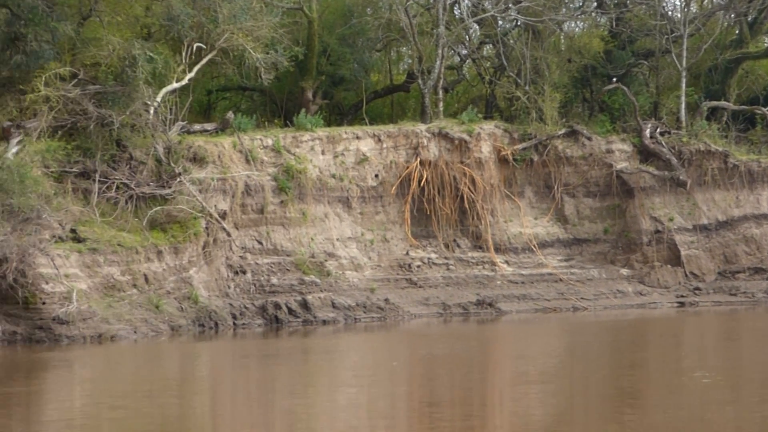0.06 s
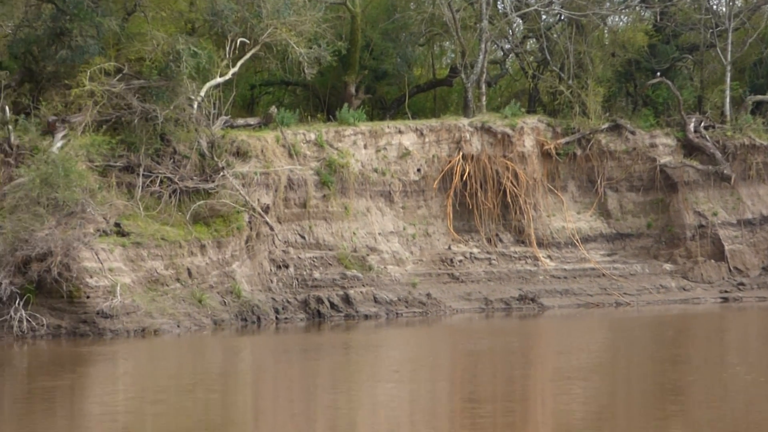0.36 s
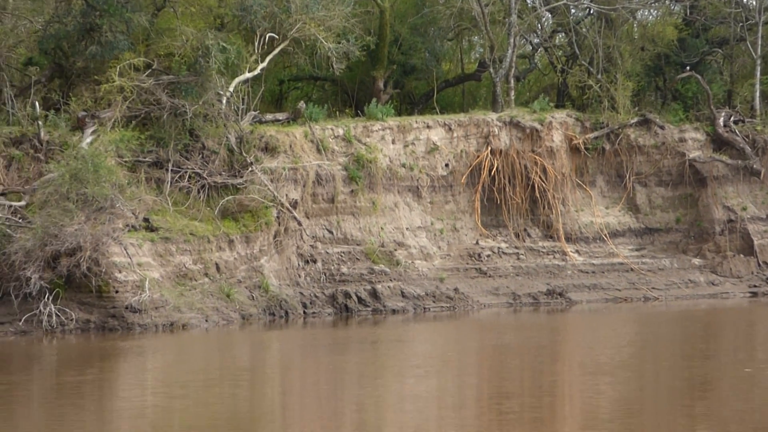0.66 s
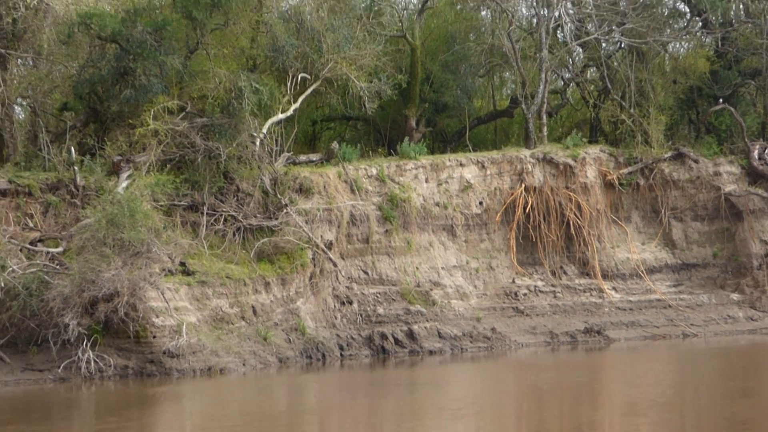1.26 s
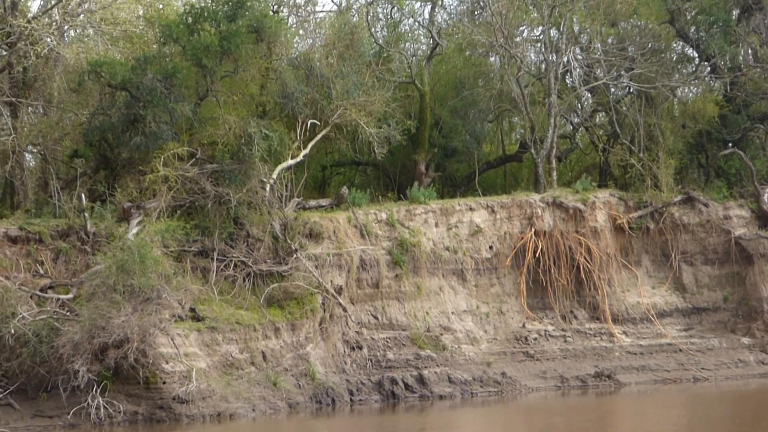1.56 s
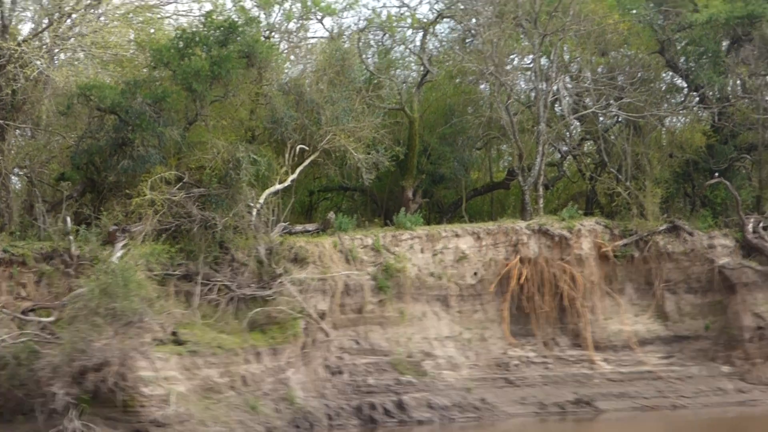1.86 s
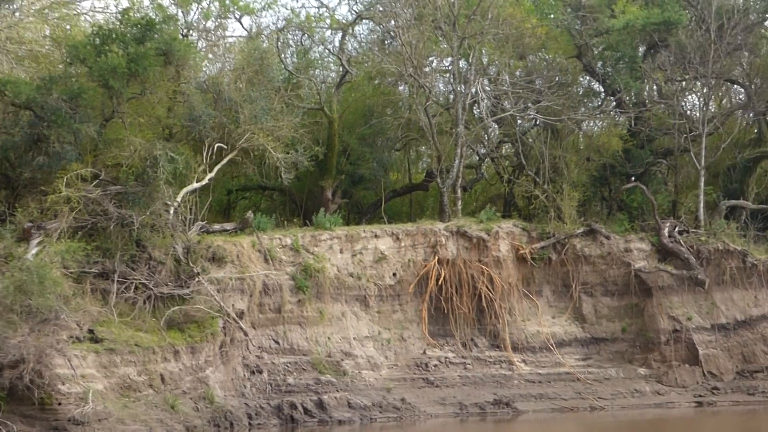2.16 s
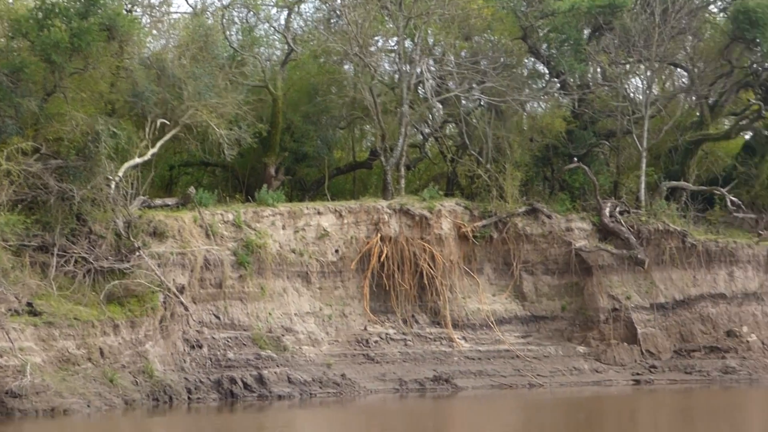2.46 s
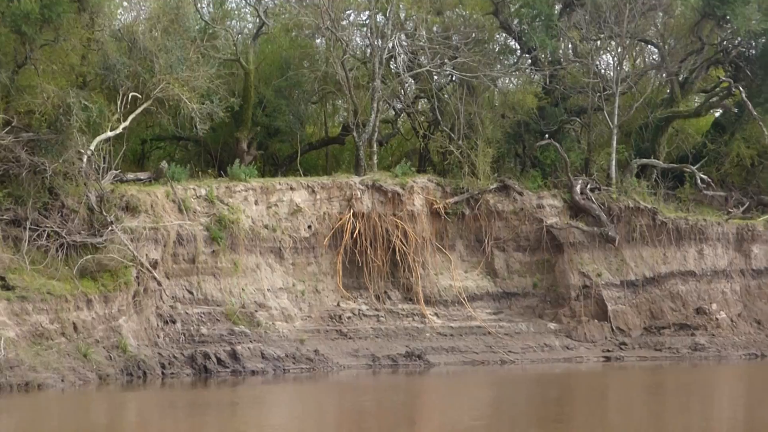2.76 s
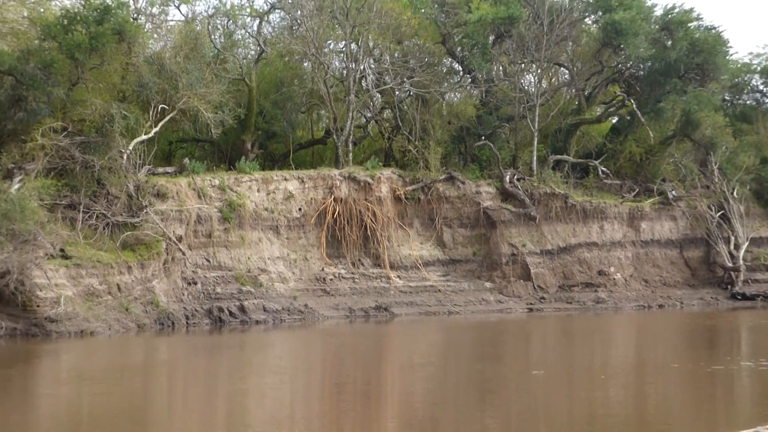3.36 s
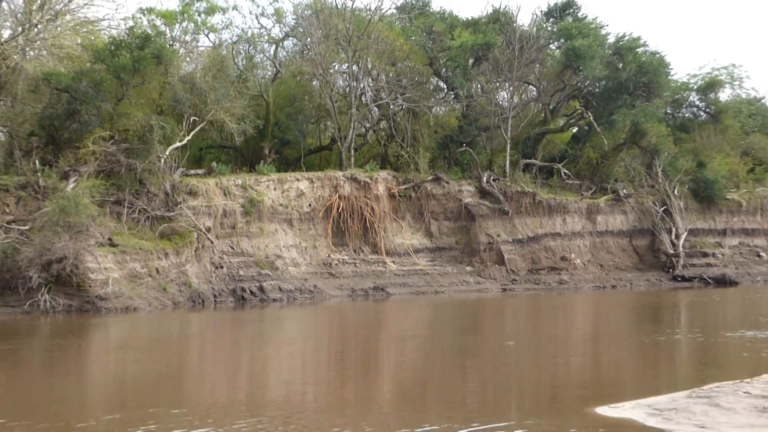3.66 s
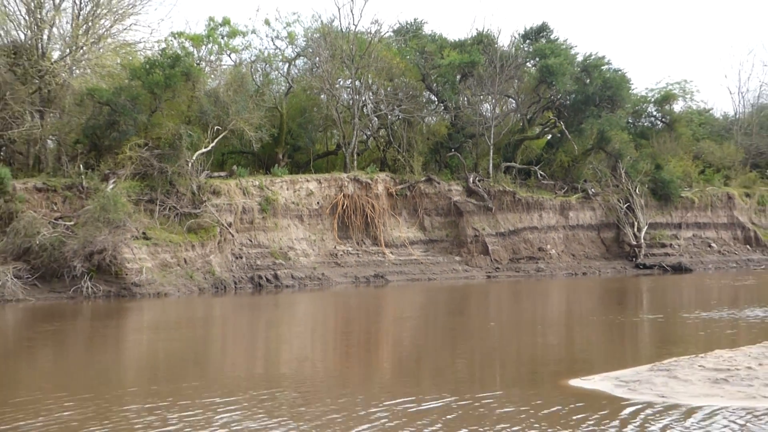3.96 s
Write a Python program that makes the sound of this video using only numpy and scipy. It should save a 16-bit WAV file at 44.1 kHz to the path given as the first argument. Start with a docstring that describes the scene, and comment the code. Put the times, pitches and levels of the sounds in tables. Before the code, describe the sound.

Birds call over a soft hush of river and leaves. One gives harsh, quick chucks for the first second, then another trills in high falling notes, with whistles around it. Chirps are busiest from 1.5 to 2.4 seconds, followed by more trills, one distant, fading after 3 seconds. From about 1.5 seconds to the end, louder wind gusts rumble, sputter and thump on the microphone.

```python
"""Birds and wind on a river bank

Over the soft hush of river and leaves, one bird chucks harshly, one trills in falling notes,
a far one trills in rising notes, and others whistle. Each note is a short sliding tone, and
the trees scatter it into echoes. From about 1.5 s gusts of wind hit the microphone, where
their swirls of air rumble, sputter and thump."""
import sys
import numpy as np
from scipy import signal
from scipy.fft import rfft, irfft
from scipy.io import wavfile
from scipy.ndimage import uniform_filter1d

SR = 44100
rng = np.random.default_rng(int(sys.argv[2]) if len(sys.argv) > 2 else 0)


def log_audio(samples):
    """Write samples as a 16-bit WAV file to the path given in sys.argv[1]."""
    # one column per channel
    frames = np.atleast_2d(samples).T
    # limit to full scale, then quantise
    limited = np.clip(frames, -1, 1)
    pcm = np.round(limited * 32767).astype(np.int16)
    wavfile.write(sys.argv[1], SR, pcm)


N = 176400
T = np.arange(N) / SR

# Tone of the hush, shared by left and right (mid) and opposite in them (side): pitch_hz, level_db
HUSH_MID_TONE = [(20, -25.5), (50, -16.5), (110, -2), (180, -4), (235, 1.5), (330, -10), (480, -8),
                 (700, -14.5), (1250, -14.5), (1600, -21.5), (2500, -21.5), (3400, -26.5), (3950, -20),
                 (5000, -20), (6500, -28), (9000, -31), (15500, -40)]
HUSH_SIDE_TONE = [(25, -28), (70, -6), (200, -13.5), (450, -3), (1200, 4), (2000, -11.5), (4500, -16),
                  (8000, -22.5), (15000, -28.5)]
# Tone of the high rustle: pitch_hz, level_db
RUSTLE_TONE = [(3000, -20.5), (5000, 15.5), (7000, -3), (9000, 7.5), (12000, -14), (15500, -11)]
# The rustle coming up late: time_s, level_db
RUSTLE_SWELL = [(0, -102), (2.8, -95.5), (2.92, -67), (3.3, -67), (4, -72)]
# Harsh chucks: start_s, level_db, change_per_overtone_db
CHUCK_NOTES = [(-.008, -52, -9), (.091, -49.5, -5.5), (.193, -48, -11), (0.291, -47.5, -17),
               (0.393, -43.5, -5.5), (.497, -42.5, -5), (.601, -41.5, -4), (0.706, -44, -2.5),
               (0.811, -41, -2)]
# Tone of the rasp in a chuck: pitch_hz, level_db
RASP_TONE = [(900, -10.5), (1500, -2), (2100, -9), (2500, -7), (3050, 5.5), (3600, -11), (8000, -15.5),
             (11000, -35)]
# Dry ticks beside some chucks: time_s, level_db
DRY_TICKS = [(0.022, -59), (0.286, -68), (0.492, -47.5), (.702, -45)]
# Long clear whistles: start_s, length_s, first_hz, middle_hz, last_hz, level_db
LONG_WHISTLES = [(.095, 0.182, 4170, 3950, 3950, -54.5), (.385, 0.13, 4510, 4745, 4805, -52),
                 (.532, 0.082, 4730, 4460, 3650, -52), (.612, 0.091, 3780, 3430, 3130, -58),
                 (.812, .063, 3700, 3784, 3840, -48), (1.795, 0.15, 5080, 4360, 4185, -47.5),
                 (2.66, .16, 4420, 4470, 4470, -55), (2.95, 0.23, 6500, 4785, 3855, -52.5),
                 (3.02, .21, 6320, 4300, 3180, -59)]
# Quick sliding whistles: start_s, length_s, first_hz, middle_hz, last_hz, level_db
QUICK_WHISTLES = [(.885, 0.029, 1510, 1540, 1500, -62), (.93, .16, 8900, 8320, 7860, -72),
                  (1.238, 0.021, 9000, 7770, 6860, -58), (1.293, 0.016, 2520, 2570, 2300, -57),
                  (1.318, 0.039, 4160, 3350, 2840, -56), (1.38, 0.058, 2740, 2360, 1920, -59.5),
                  (1.537, 0.028, 4270, 3420, 2420, -55.5), (1.517, 0.11, 2413, 2635, 2070, -57.5),
                  (1.59, 0.081, 2890, 3290, 3800, -52), (1.672, 0.087, 3900, 4750, 5750, -44),
                  (1.684, 0.022, 4850, 5540, 5970, -55), (1.695, 0.097, 2650, 2314, 2036, -59),
                  (1.754, 0.028, 5800, 6600, 9050, -51.5), (1.781, 0.019, 8560, 7900, 5000, -56),
                  (1.801, 0.054, 4500, 2890, 2130, -50), (1.88, 0.075, 1985, 2075, 2120, -58),
                  (1.893, 0.053, 2610, 3070, 3140, -58), (1.978, 0.067, 2035, 2300, 1890, -59),
                  (1.975, 0.05, 7100, 7300, 5900, -48.5), (2.039, 0.033, 6990, 5200, 3960, -47),
                  (2.063, 0.052, 4250, 3120, 1850, -51), (2.124, .028, 4990, 5460, 7850, -46.5),
                  (2.135, 0.053, 2330, 2965, 3750, -52.5), (2.154, 0.017, 7710, 5720, 5100, -43.5),
                  (2.172, 0.12, 4890, 5230, 5080, -55), (2.211, 0.06, 9100, 7150, 8200, -52.5),
                  (2.255, 0.047, 4300, 4200, 3480, -47.5), (2.288, 0.023, 2810, 2660, 2720, -51.5),
                  (2.283, 0.089, 3840, 3730, 3420, -53.5), (2.302, 0.036, 5030, 4700, 4200, -46.5),
                  (2.333, 0.027, 2730, 2250, 1960, -53.5), (2.365, 0.051, 4050, 3966, 3960, -47),
                  (2.73, 0.18, 3960, 3960, 4020, -61), (3.158, 0.012, 5530, 6600, 6800, -47.5),
                  (3.164, 0.012, 7140, 7600, 8100, -48)]
# A thin squeak and its falling tail: start_s, length_s, first_hz, middle_hz, last_hz, level_db
HIGH_SQUEAK = [(1.578, .06, 13040, 12980, 13300, -61), (1.622, 0.018, 12800, 12400, 11200, -63)]
# Falling trill notes: start_s, top_hz, fall_s, level_db
FALLING_NOTES = [(0.898, 6050, 0.013, -50), (0.968, 6120, 0.016, -47), (1.043, 5970, 0.017, -49),
                 (1.115, 6100, 0.018, -49.5), (1.19, 6270, 0.019, -52), (1.269, 5950, 0.018, -53.5),
                 (1.344, 5700, 0.016, -53), (2.343, 7210, 0.017, -44.5), (2.558, 7420, 0.022, -48.5),
                 (2.646, 6620, 0.016, -49), (2.735, 6500, 0.016, -50.5), (2.82, 6450, 0.015, -49),
                 (2.903, 6280, 0.018, -50), (2.987, 6800, 0.016, -51.5), (3.073, 6710, 0.019, -53),
                 (3.16, 6110, 0.014, -53), (3.311, 5900, 0.017, -61.5), (3.353, 5670, 0.016, -61),
                 (3.393, 6300, 0.022, -60.5), (3.422, 5500, 0.014, -65), (3.459, 7350, 0.024, -65),
                 (3.479, 5800, 0.012, -58.5), (3.549, 5960, 0.016, -61), (3.612, 5710, 0.015, -59),
                 (3.633, 6300, 0.015, -64), (3.68, 5700, 0.02, -67), (3.738, 6460, 0.02, -71),
                 (3.877, 5830, 0.023, -68)]
# Strength of the wind on the microphone: time_s, rumble_db, sputter_db
GUST_LEVELS = [(0, -100, -75), (1.2, -76, -100), (1.39, -48, -103), (1.45, -58.5, -79),
               (1.56, -36.5, -69.5), (1.78, -34.5, -51), (1.9, -36, -56.5), (2.14, -27.5, -42),
               (2.27, -30, -54), (2.33, -30, -45.5), (2.478, -31.5, -35), (2.506, -41.5, -63),
               (2.53, -31, -48.5), (2.6, -30, -47.5), (2.71, -26.5, -42), (2.84, -30.5, -71.5),
               (3.03, -28, -56), (3.08, -34.5, -81), (3.24, -33, -72), (3.275, -45.5, -109),
               (3.33, -31, -107), (3.39, -40.5, -90), (3.45, -28, -61.5), (3.58, -38.5, -47.5),
               (3.68, -28.5, -42.5), (3.8, -31.5, -37.5), (3.88, -32.5, -41), (4, -30.5, -42)]
# Which side the gusts favour: time_s, left_minus_right_db
GUST_PAN = [(1.5, -3.5), (1.99, -4), (2.07, 2), (2.16, 2.5), (2.22, -3.5), (2.48, -1.5), (2.53, 5.5),
            (2.66, 4), (2.72, 0), (2.92, 5), (3.03, -1.5), (3.35, 7.5), (3.52, -5.5), (3.59, 6.5),
            (3.65, -5), (4, -2)]
# Tone of the wind's low rumble and higher sputter, mid and side: pitch_hz, level_db
RUMBLE_MID_TONE = [(20, -55), (40, -45), (70, -14), (120, -6.5), (170, 1), (230, 1.5), (360, -4),
                   (415, -12.5), (460, -8.5), (600, -19.5), (850, -29.5), (1400, -42), (3000, -80)]
RUMBLE_SIDE_TONE = [(20, -56), (60, -31), (120, 2), (240, 7), (360, 2.5), (415, -3.5), (470, 3.5),
                    (650, -8), (900, -14), (1400, -26), (3000, -85)]
SPUTTER_MID_TONE = [(200, -26), (500, 9.5), (800, -1.5), (1200, -10), (1700, -17), (2500, -28), (4000, -32),
                    (9000, -71)]
SPUTTER_SIDE_TONE = [(200, -27.5), (500, 16), (800, 2), (1200, -5), (1700, -16), (2500, -25.5),
                     (4000, -41.5), (9000, -66)]
# Single hard thumps of wind: peak_s, level_db, length_s, pitch_hz, sputter_db, left_minus_right_db
WIND_THUMPS = [(1.512, -31, 0.0089, 166, -70, -10), (1.779, -20.5, 0.0043, 253, -39, 0),
               (1.98, -24, 0.0067, 280, -31, -15), (2.051, -20, 0.0064, 254, -34, 10),
               (2.136, -23, 0.014, 300, -32.5, 5), (2.22, -13.5, 0.011, 213, -38.5, -4.5),
               (2.299, -20.5, 0.006, 340, -33, -6), (2.325, -34, 0.0037, 415, -23, -1.5),
               (2.404, -14.5, 0.0081, 276, -44, 4), (2.435, -12.5, 0.0067, 316, -29.5, -14),
               (2.466, -16.5, 0.0092, 265, -27, 3.5), (2.522, -17, 0.009, 222, -41, 3),
               (2.705, -24, 0.0078, 250, -34.5, -13), (2.867, -13.5, 0.0073, 229, -66, 2.5),
               (2.944, -21.5, 0.0054, 310, -37, -6), (3.02, -15.5, 0.0083, 226, -55, -5),
               (3.243, -20, 0.0081, 190, -55, 2.5), (3.337, -20.5, 0.012, 176, -75, 5),
               (3.586, -20.5, 0.0052, 245, -45, 15)]
# The far bird's rising notes: start_s, level_db
RISING_NOTES = [(2.41, -54), (2.475, -57), (2.536, -52.5), (2.592, -50), (2.649, -52.5), (2.71, -55.5),
                (2.769, -55), (2.826, -55.5), (2.89, -55.5), (2.948, -56)]

TREE_ECHO_S = 0.55  # time for the scattered sound to fade by 60 dB


def amp(db):
    """Turn decibels into a number to multiply by."""
    return 10 ** (np.asarray(db) / 20)


def curve(rows, column=1):
    """Join a table's points with straight lines over time."""
    rows = np.array(rows)
    return np.interp(T, rows[:, 0], rows[:, column])


def noise(tone):
    """Noise of strength 1, with its lows and highs shaped by a tone table."""
    hz, db = np.array(tone).T
    all_hz = np.maximum(np.fft.rfftfreq(N, 1 / SR), 1)
    gains = amp(np.interp(np.log(all_hz), np.log(hz), db))
    shaped = irfft(rfft(rng.standard_normal(N)) * gains, N)
    return shaped / shaped.std()


def wander(rate_hz):
    """A smooth random wobble with a typical size of 1."""
    jagged = np.interp(T * rate_hz, np.arange(N), rng.standard_normal(N))
    smooth = uniform_filter1d(jagged, max(int(SR / rate_hz / 2), 1))
    return smooth / smooth.std()


def keep_band(sound, band, edge_hz):
    """Keep the "low" or the "high" part of a sound."""
    return signal.sosfilt(signal.butter(2, edge_hz, band, fs=SR, output="sos"), sound)


def add(track, start_s, sound):
    """Mix a sound into a track at a given time."""
    i = int(start_s * SR)
    sound, i = sound[max(-i, 0):], max(i, 0)
    track[i:i + len(sound)] += sound[:N - i]


def stereo(mid, side):
    """Make left and right from a shared part (mid) and an opposite part (side)."""
    return np.array([mid + side, mid - side])


def pan(left_minus_right_db):
    """Left and right gains that keep the same average level."""
    gains = amp(stereo(0, np.atleast_1d(left_minus_right_db) / 2))
    return gains / gains.mean(axis=0)


def progress(length_s):
    """Count from 0 to 1 over a note."""
    return np.linspace(0, 1, int(length_s * SR))


def note(hz, attack=0.12, release=0.14, flutter_db=2.5):
    """A slightly wavering tone. Attack and release are the shares spent fading in and out."""
    along = np.linspace(0, 1, len(hz))
    waver, flutter = (np.interp(T[:len(hz)] * 200, np.arange(256), points)  # 200 points a second
                      for points in rng.standard_normal((2, 256)))
    ramp = np.minimum(along / attack, (1 - along) / release)
    edges = np.sin(np.pi / 2 * np.minimum(ramp, 1)) ** 2
    phase = 2 * np.pi * np.cumsum(hz * (1 + 0.0041 * waver)) / SR
    return edges * amp(flutter_db * flutter) * np.sin(phase)


def place_call(start_s, db, sound, near_db=-50):
    """Return a call's direct sound and its feed to the trees. Weak calls are far, so echo more."""
    track = np.zeros(N)
    add(track, start_s, sound)
    extra_db = 0.11 * max(near_db - db, 0)
    return np.outer(amp([db, db + extra_db]), track)


def hush(mid_db=-56.5, side_db=-67):
    """River and leaves make a soft, steady noise; a faint high rustle joins later."""
    bed = stereo(amp(mid_db) * noise(HUSH_MID_TONE), amp(side_db) * noise(HUSH_SIDE_TONE))
    bed *= amp(0.31 * wander(9.86))
    rustle = amp(curve(RUSTLE_SWELL) + 1.2 * wander(3.9)) * noise(RUSTLE_TONE)
    return bed + rustle


def chucking_bird(from_hz=2950, to_hz=1561, roughness=0.045, ring_hz=1970, ring_width_hz=220):
    """Rough, steeply falling notes and dry ticks ring in the bird's throat."""
    voice, along = np.zeros(N), progress(length_s=0.022)
    jitter, rasp = wander(2500), noise(RASP_TONE)
    swell = np.sin(np.pi * along)
    slide_hz = from_hz + (to_hz - from_hz) * along
    for start, db, overtone_db in CHUCK_NOTES:
        shift = int(start * SR)
        hz = slide_hz * (1 + roughness * along * np.roll(jitter, shift)[:len(along)])
        phase = 2 * np.pi * np.cumsum(hz) / SR
        tone = sum(amp(overtone_db * k) * swell ** (k + 1) * np.sin((k + 1) * phase) for k in range(4))
        add(voice, start, amp(db - 11) * tone)
        add(voice, start, amp(db - 11.5) * swell ** 2 * np.roll(rasp, shift)[:len(along)])
    tick_noise = noise([(800, -18), (2000, -0.5), (4000, 0), (8500, -15), (12000, -27)])
    for when, db in DRY_TICKS:
        voice += amp(db) * tick_noise * np.exp(-((T - when) / 0.0012) ** 2)
    throat = signal.iirpeak(ring_hz, ring_hz / ring_width_hz, fs=SR)
    voice += amp(6.5) * signal.lfilter(*throat, voice)
    return trees(voice, voice, echo_db=-2.5, fade_s=0.093)


def trunks(feed, spread_s=0.038, level_db=-17):
    """Twelve nearby trunks each send back one weak echo, different on the left and right."""
    echoes = np.zeros((2, N))
    for lag, mid, side in rng.random((12, 3)):
        delay = int((0.003 + lag * spread_s) * SR)
        echoes[:, delay:] += stereo(mid - 0.5, (side - 0.5) / 2)[:, None] * feed[:N - delay]
    return amp(level_db) * echoes


def trees(direct, feed, echo_db, fade_s=TREE_ECHO_S, pan_db=0, rise_s=0.0012, side_db=-21):
    """Trunks and bank scatter the feed into a fading echo, which joins the direct call."""
    t = T[:SR]
    grain = rng.standard_normal((2, SR))
    dull = keep_band(grain, "low", edge_hz=6150)
    fade = np.exp(-np.log(1000) * t / fade_s)
    tails = dull * fade + (grain - dull) * fade ** (1 / 0.44)  # the highs die sooner in air
    tails *= 1 - np.exp(-t / rise_s)
    mid, side = (amp(echo_db) * signal.fftconvolve(feed, tail / np.linalg.norm(tail))[:N]
                 for tail in tails)
    near_echoes = trunks(feed) * min(fade_s / TREE_ECHO_S, 1)
    heard = stereo(direct + mid, amp(side_db) * side) + near_echoes
    return heard * amp([[pan_db / 2], [-pan_db / 2]])


def whistling_birds(rows, echo_db, **note_settings):
    """Each whistle slides along an arc through three pitches; leaves blur the highest ones."""
    calls = np.zeros((2, N))
    for start, length, first_hz, middle_hz, last_hz, db in rows:
        arc = np.polyfit([0, 0.5, 1], [first_hz, middle_hz, last_hz], 2)
        hz = np.polyval(arc, progress(length))
        calls += place_call(start, db, note(hz, **note_settings))
    direct, feed = calls
    highs = keep_band(direct, "high", edge_hz=4660)  # leaves turn part of this into echo
    return trees(direct - 0.28 * highs, feed + amp(-3.5) * highs, echo_db, pan_db=3)


def trilling_bird(end_hz=3628, falls_per_note=2.72, bounce_s=0.00193, bounce_db=-13):
    """Each note drops fast to the same low pitch and beats against its own bounce off the water."""
    calls = np.zeros((2, N))
    for start, top_hz, fall_s, db in FALLING_NOTES:
        along = progress(fall_s * falls_per_note)
        hz = end_hz + (top_hz - end_hz) * np.exp(-(along * falls_per_note) ** 1.3)
        chirp = amp(-2.5 * along) * note(hz, flutter_db=4.5)
        calls += place_call(start, db, chirp)
        calls += place_call(start + bounce_s, db + bounce_db, chirp)
    return trees(*calls, echo_db=-6.5, pan_db=-2)


def far_twitter(count=18, span_s=(1.15, 2.4), range_hz=(2295, 5410), length_s=0.06, level_db=-62):
    """Faint, far birds whistle at random times and pitches, blurred by the trees."""
    rows = []
    for when, pitch, *bends in rng.random((count, 5)):
        hz = np.interp(pitch, [0, 1], range_hz) * (1 + 0.082 * (2 * np.array(bends) - 1))
        rows.append((np.interp(when, [0, 1], span_s), length_s, *hz, level_db))
    return whistling_birds(rows, echo_db=-4)


def even_out(sound, window_s=0.03, amount=0.49):
    """Partly flatten the random swells of a noise."""
    power = uniform_filter1d(sound ** 2, int(window_s * SR))
    return sound / power ** (amount / 2)


def wind():
    """Swirling air rumbles on the microphone's two openings; hard gusts also sputter and thump."""
    rumble_db, sputter_db = curve(GUST_LEVELS, column=1), curve(GUST_LEVELS, column=2)
    swirl_db = 2.18 * wander(rate_hz=90)
    flicker_db = 4 * wander(rate_hz=170)
    # Gentle gusts have only the deepest part of the rumble.
    full = even_out(noise(RUMBLE_MID_TONE))
    deep = keep_band(full, "low", edge_hz=252)
    mid = deep + (full - deep) * amp(0.36 * np.minimum(sputter_db + 52.5, 3))
    sputter = stereo(amp(-2.5) * noise(SPUTTER_MID_TONE), amp(2) * noise(SPUTTER_SIDE_TONE))
    # Hard gusts push left and right against each other.
    side_db = -1.5 + 0.28 * np.minimum(sputter_db - rumble_db + 15, 6)
    rumble = stereo(amp(0.5) * mid, amp(side_db) * even_out(noise(RUMBLE_SIDE_TONE)))
    flow = amp(rumble_db + swirl_db) * rumble + amp(sputter_db + swirl_db + flicker_db) * sputter
    return flow * pan(curve(GUST_PAN)) + wind_thumps(sputter)


def wind_thumps(sputter, rise=0.69):
    """Each hard swirl gives a quick thump and a spit of sputter, usually louder on one side."""
    thumps = np.zeros((2, N))
    for start_turn, row in zip(rng.random(len(WIND_THUMPS)), WIND_THUMPS):
        peak_s, db, length_s, hz, sputter_db, pan_db = row
        t = T - peak_s
        width_s = length_s / 2 * np.where(t < 0, rise, 2 - rise)  # rises faster than it falls
        push = np.exp(-(t / width_s) ** 2)
        ring = amp(db) * np.sin(2 * np.pi * (hz * t + start_turn))
        thumps += pan(pan_db) * push * (ring + amp(sputter_db) * sputter)
    return thumps


def far_trilling_bird(from_hz=2700, top_hz=3216):
    """Quick rising notes whose tops linger in the trees."""
    voice = np.zeros(N)
    hz = from_hz + (top_hz - from_hz) * np.sin(1.93 * progress(length_s=0.025))
    for start, db in RISING_NOTES:
        add(voice, start, amp(db) * note(hz))
    return trees(voice, voice, echo_db=-2.5)


def scene():
    """Mix the hush, the birds and the wind."""
    whistles = whistling_birds(LONG_WHISTLES, echo_db=-12.5, attack=0.25, flutter_db=0.8)
    whistles += whistling_birds(QUICK_WHISTLES + HIGH_SQUEAK, echo_db=-7.5)
    background = wind() + hush()
    birds = whistles + chucking_bird() + trilling_bird() + far_trilling_bird() + far_twitter()
    return background + birds


def record(dry):
    """Cut away the very highest treble."""
    top_hz = 15750
    return signal.sosfilt(signal.ellip(10, 0.2, 80, top_hz, fs=SR, output="sos"), dry)


dry = scene()
out = record(dry)
log_audio(out)
```